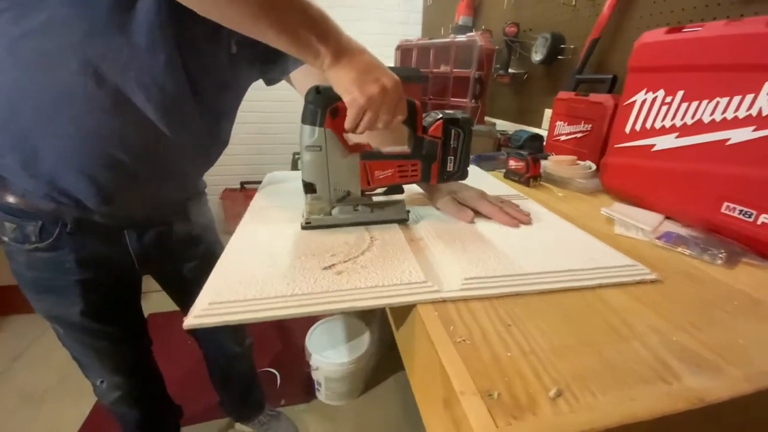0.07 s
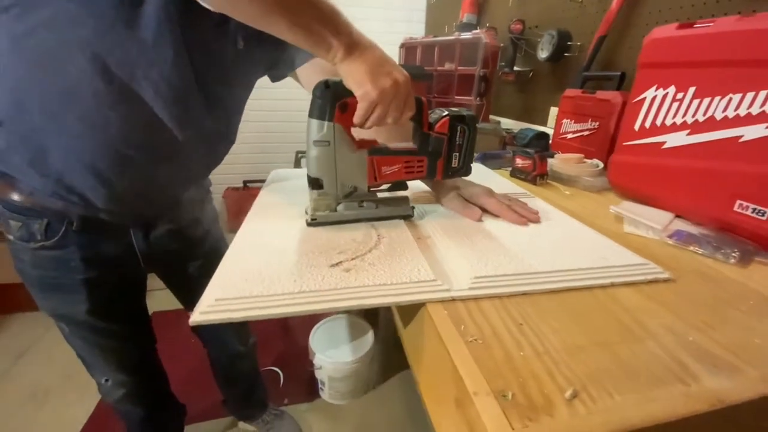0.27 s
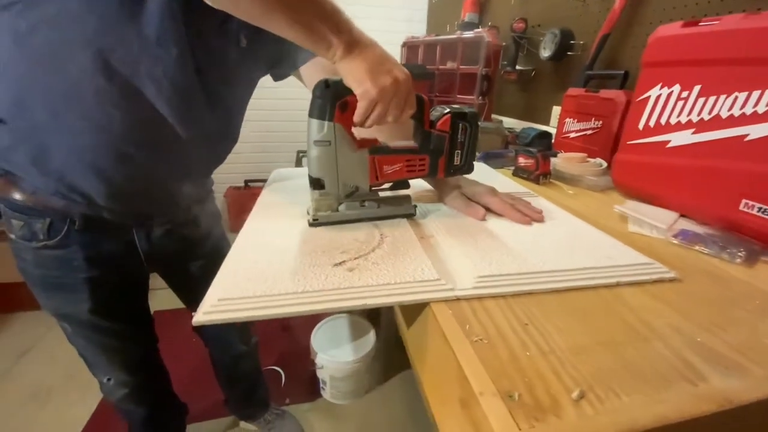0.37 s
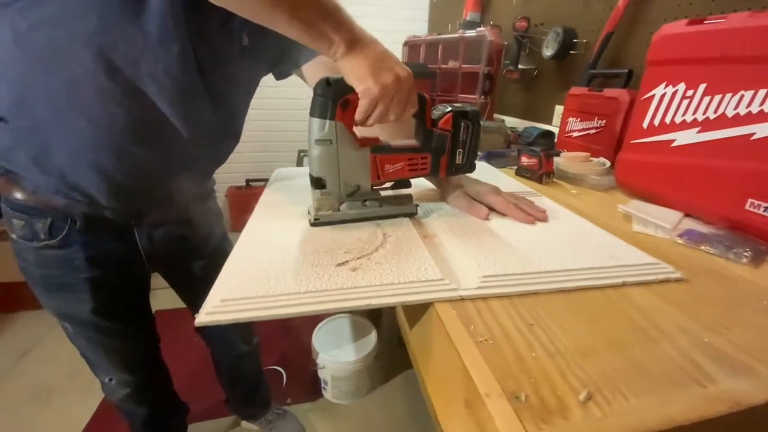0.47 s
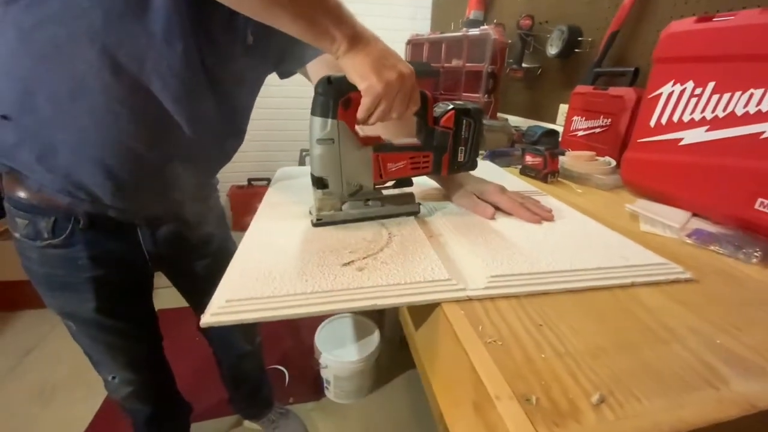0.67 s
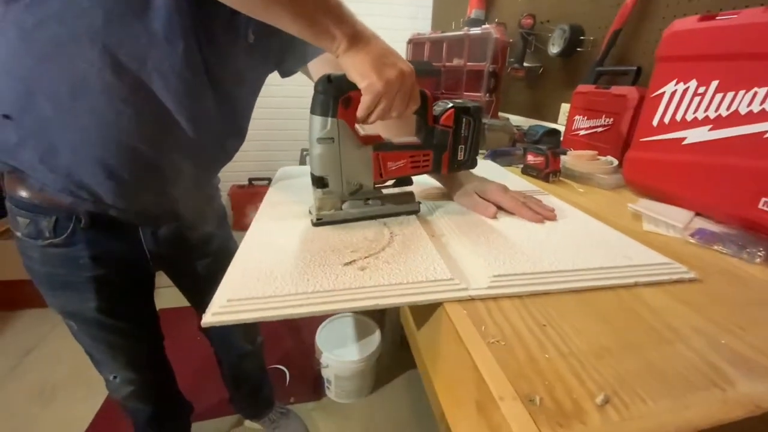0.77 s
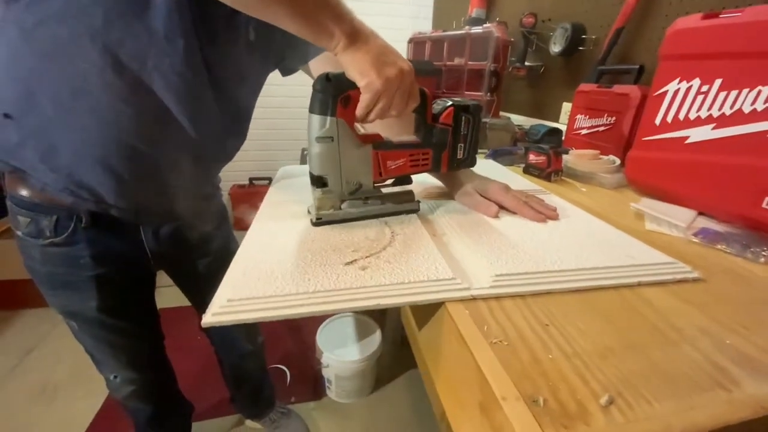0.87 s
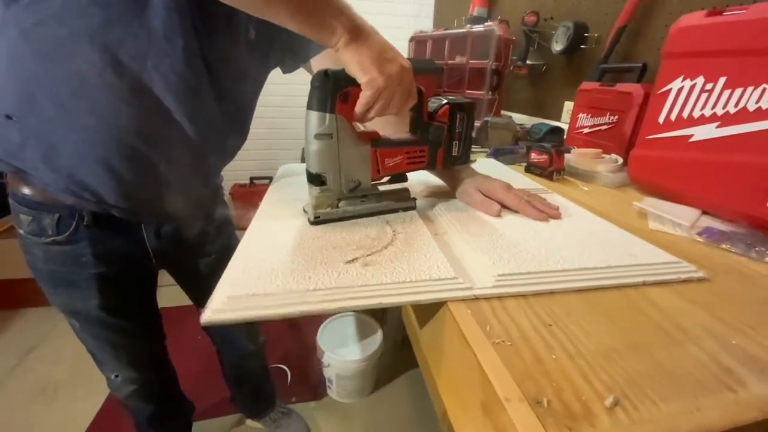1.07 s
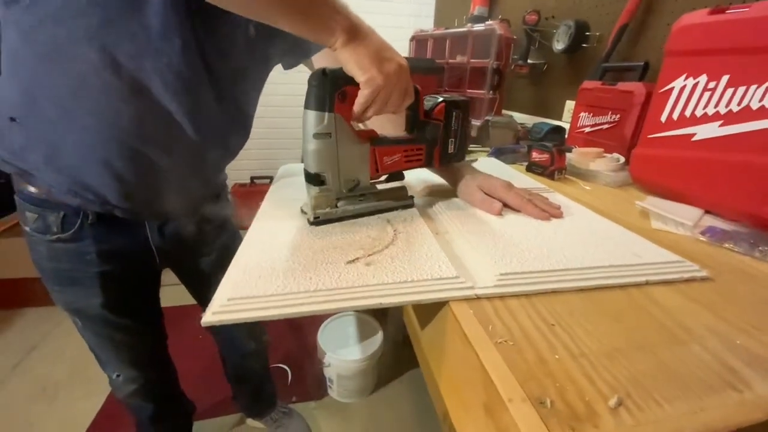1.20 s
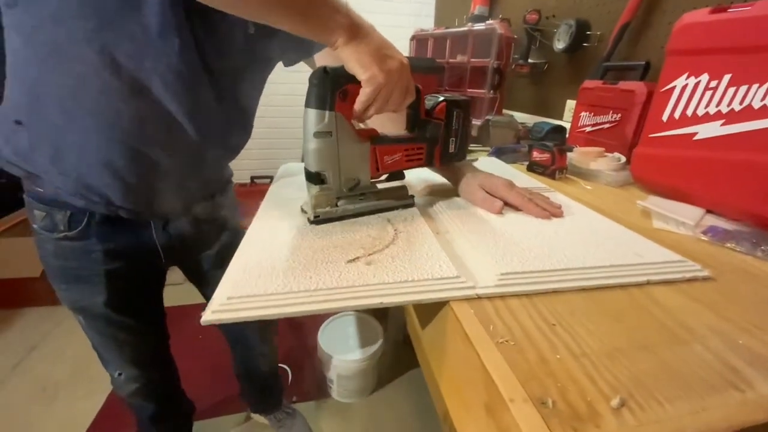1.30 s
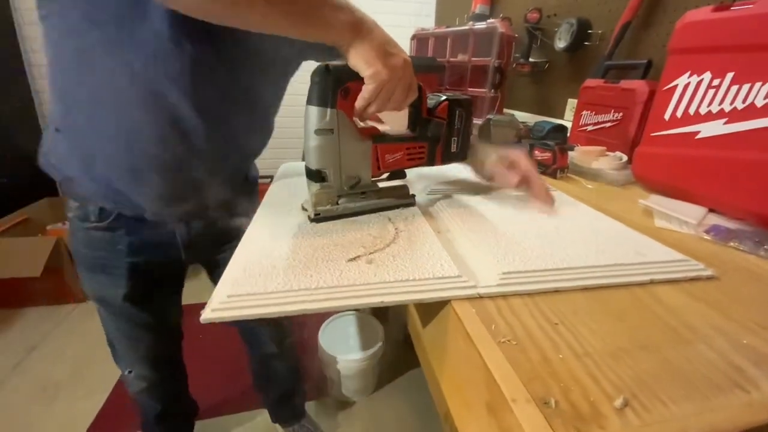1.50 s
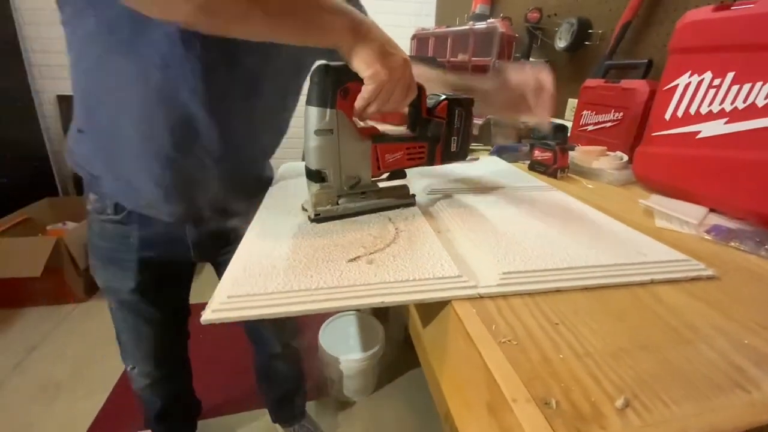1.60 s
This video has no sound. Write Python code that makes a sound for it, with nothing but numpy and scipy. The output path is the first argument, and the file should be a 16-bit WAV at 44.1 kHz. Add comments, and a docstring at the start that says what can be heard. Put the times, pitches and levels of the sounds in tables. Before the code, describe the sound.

A cordless jigsaw rasps and squeals through a panel, then slows and stops.

```python
"""A rattling, squealing rasp: a cordless jigsaw cuts a panel at 25 strokes a second, slows and stops.
The drive shakes the panel, which thumps and buzzes on the workbench. Loose parts rattle, the teeth
tear through the board, and the steel blade sticks and slips in the kerf, squealing on most strokes.
A few light knocks and a soft slide follow as the hands shift; a small workshop rings behind."""
import sys
import numpy as np
from scipy import signal
from scipy.fft import rfft, irfft, next_fast_len
from scipy.io import wavfile

SR = 44100
rng = np.random.default_rng(int(sys.argv[2]) if len(sys.argv) > 2 else 0)


def to_wav(s):
    """Save 16-bit WAV."""
    ch = np.atleast_2d(s).T  # columns
    pcm = np.round(np.clip(ch, -1, 1) * 32767)  # PCM
    wavfile.write(sys.argv[1], SR, pcm.astype(np.int16))


N = 72765
T = np.arange(N) / SR
FFT_SIZE = next_fast_len(2 * N)
BINS_HZ = np.maximum(np.arange(FFT_SIZE // 2 + 1) * SR / FFT_SIZE, 1)


def from_db(db):
    """Decibels to gain."""
    return 10 ** (np.asarray(db) / 20)


def rms_one(x):
    """Scale to rms 1."""
    return x / np.sqrt(np.mean(x ** 2) + 1e-20)


def curve(rows):
    """Join (t/s, value) rows by straight lines."""
    return np.interp(T, *np.transpose(rows))


def fader(rows):
    """Gain from (t/s, level/dB) rows, dying away at 180 dB a second after the last."""
    return from_db(curve(rows) - 180 * np.maximum(T - rows[-1][0], 0))


def swell(start, length):
    """Half a sine, rising from and falling to nothing."""
    return np.maximum(np.sin(np.pi * np.clip((T - start) / length, 0, 1)), 0)


def at_hz(rows, column=1):
    """One column of a spectrum table at every frequency."""
    rows = np.array(rows, float)
    return np.interp(np.log(BINS_HZ), np.log(rows[:, 0]), rows[:, column])


def through(x, response):
    """Filter by a frequency response."""
    return irfft(rfft(x, FFT_SIZE) * response, FFT_SIZE)[..., :N]


def colour(x, spectrum):
    """Equalise by (f/Hz, level/dB) rows; rms 1."""
    return rms_one(through(x, from_db(at_hz(spectrum))))


def edge(x, hz, kind, order=2):
    """High- or low-pass."""
    return signal.sosfilt(signal.butter(order, hz, kind, fs=SR, output="sos"), x)


def drift(hz):
    """Random wander below hz; rms 1."""
    return rms_one(edge(rng.standard_normal(2 * N), hz, "low")[N:])


def two_pole(x, hz, radius):
    """Band-pass that rings longer as its pole radius nears 1."""
    feedback = [1, -2 * radius * np.cos(2 * np.pi * hz / SR), radius ** 2]
    return signal.lfilter([1, 0, -1], feedback, x + 1e-18)


def resonate(x, hz, width_hz):
    """One resonance; rms 1."""
    return rms_one(two_pole(x, hz, np.exp(-np.pi * width_hz / SR)))


def body(x, modes):
    """Resonances in parallel, alternating in polarity; rms 1."""
    return rms_one(sum((-1) ** k * from_db(db) * resonate(x, hz, width)
                       for k, (hz, width, db) in enumerate(modes)))


def grains(per_s=11000, spread_db=2.5):
    """Fibres snap at random, a few much louder than the rest."""
    sizes = from_db(spread_db * np.minimum(rng.exponential(1, N), 4))
    return rms_one(sizes * rng.choice([-1, 1], N) * (rng.random(N) < per_s / SR))


def rattle(turns, count=52, jitter_s=.00006, spread_db=2):
    """Loose parts touch at the same crank angles on every stroke, never quite alike."""
    angles = (np.arange(count) + rng.random(count)) / count
    contact_turns = np.arange(-20, 20)[:, None] + angles
    times = np.interp(contact_turns, turns, T, left=-1, right=-1)
    times += jitter_s * rng.standard_normal(times.shape)
    force = rng.choice([-1, 1], count) * from_db(spread_db * rng.standard_normal(times.shape))
    inside = (times > 0) & (times < T[-1])
    return rms_one(np.bincount((times[inside] * SR).astype(int), force[inside], N))


def drive(turns, stroke_hz):
    """The reciprocating mass shakes the panel; at low speed the bench booms and shudders."""
    # tones of the drive: multiple of the stroke rate, level/dB
    orders = [(2, -26), (3, -17.5), (4, -8), (5, -1.5), (6, -5.5), (7, -1), (8, 5), (9, 2), (11, -13),
              (12, -11.5), (13, -1.5), (17, -5), (24, -10), (25, -6.5), (32, 1), (47, 2.5), (53, -2),
              (55, 2)]
    # booming modes of panel and bench: f/Hz, width/Hz, level/dB
    boom_modes = [(115, 51, -3.5), (206, 52, -3), (385, 320, -3)]
    # how hard the panel shakes: t/s, level/dB
    shake_level = [(0.0, -40), (0.04, -42.5), (0.078, -50), (0.146, -41.5), (0.175, -46), (0.196, -34),
                   (0.256, -34), (0.334, -40.5), (0.666, -33.5), (0.876, -44), (0.954, -33), (1.012, -33),
                   (1.05, -36), (1.08, -32.5), (1.186, -45), (1.264, -60), (1.28, -64)]
    peak_turn, scatter_cycles = .7, .54   # the tones roughly line up at this part of the turn
    tones = sum(from_db(db) * np.cos(2 * np.pi * (k * (turns - peak_turn) + scatter_cycles * rng.random()))
                for k, db in orders)
    slowdown_hz = np.clip(stroke_hz.max() - stroke_hz, 0, 6)
    hum = from_db(1.5 - 1.8 * slowdown_hz) * rms_one(tones)
    shaking = body(rattle(turns) + .5 * grains(), boom_modes)
    boom = from_db(-17 + 1.7 * slowdown_hz) * rms_one(edge(shaking, 79, "high", order=4))
    shudder = from_db(-9.5) * slowdown_hz / slowdown_hz.max() * resonate(grains(), hz=100, width_hz=62)
    return fader(shake_level) * (hum + boom + shudder)


def loose_panel(turns, waver_rad=.78, peak_turn=.75, rise_s=.0056):
    """The loose panel thumps on the bench and now and then buzzes, throbbing once a stroke."""
    # brief buzzes: t/s, length/s, level/dB, f/Hz
    buzzes = [(0.365, 0.096, -36.5, 599.5), (0.731, 0.18, -35, 615), (0.869, 0.15, -40.5, 590)]
    # thumps on the bench: t/s, level/dB, f/Hz, time to fall 20 dB/s
    thumps = [(0, -23, 172, 0.023), (.13, -40, 104, 0.039), (0.208, -34.5, 103, 0.056),
              (0.247, -29.5, 122, 0.074), (.256, -33, 185, .1), (.955, -35, 105.5, 0.12),
              (1.02, -32, 119, .09), (1.039, -25, 209, 0.04), (1.045, -27, 413, 0.029),
              (1.151, -37, 106, 0.084)]
    throb = 1 + np.cos(2 * np.pi * (turns - peak_turn))
    out = np.zeros(N)
    for start, length, db, hz in buzzes:
        tone = np.sin(2 * np.pi * hz * T + waver_rad * drift(hz=30))
        out += from_db(db) * swell(start, length) * throb * tone
    for start, db, hz, decay in thumps:
        age = np.maximum(T - start, 0)
        envelope = (1 - np.exp(-age / rise_s)) * from_db(db - 20 * age / decay)
        out += envelope * np.sin(2 * np.pi * hz * age)
    return out


def tooth_bite(turns, stroke_db=.5, return_db=1.05, chatter_db=1.6):
    """The teeth bite most at the top of the stroke, again on the return, and unevenly tooth to tooth."""
    angle = 2 * np.pi * turns
    return from_db(stroke_db * np.cos(angle) + return_db * np.cos(2 * angle) + chatter_db * drift(hz=170))


def cutting(turns, bite, crossover_hz=4170):
    """Rattle and tearing fibres sound through the body; the blade scrapes the kerf atop each stroke."""
    # tone of the tearing board: f/Hz, level/dB
    cut_spectrum = [(250, -3.5), (450, -8.5), (750, -5), (1100, -5.5), (1700, -2.5), (2300, 0.5),
                    (2900, -1), (3800, -7.5), (4800, -8.5), (5800, -4.5), (7000, -9.5), (8500, -13),
                    (11000, -12.5), (13000, -12), (15500, -21.5)]
    # modes of panel and saw body: f/Hz, width/Hz, level/dB
    body_modes = [(489, 25.7, -13), (618, 360, -11.5), (976, 91, -11), (1366, 170, 1.5), (2570, 40, -6.5),
                  (3150, 74, -10.5)]
    # bright modes of blade clamp and shoe: f/Hz, width/Hz, level/dB
    shoe_modes = [(6120, 1025, -1), (7400, 870, -4), (11150, 140, -6), (12650, 410, -13.5)]
    # fader for the rasp and the ringing body: t/s, level/dB
    rasp_level = [(0.0, -42.5), (0.024, -44.5), (0.074, -46), (0.11, -38), (0.178, -47), (0.196, -33.5),
                  (0.216, -39), (0.23, -31.5), (0.238, -32), (0.38, -29.5), (0.752, -31.5), (0.786, -29.5),
                  (1.114, -32), (1.126, -40.5), (1.136, -28.5), (1.172, -48), (1.254, -60.5), (1.28, -62)]
    # fader for chips, scrape and shoe: t/s, level/dB
    treble_level = [(0.0, -41), (0.078, -48), (0.116, -41.5), (0.174, -54), (0.188, -38), (0.212, -41.5),
                    (0.22, -35.5), (0.58, -32), (0.59, -36), (0.602, -33.5), (0.612, -34.5), (1.026, -34),
                    (1.058, -37.5), (1.066, -32.5), (1.126, -37.5), (1.14, -37.5), (1.226, -69),
                    (1.28, -82)]
    clatter = rattle(turns)
    teeth = bite * (from_db(-2) * grains() + from_db(-3.5) * clatter)
    tearing = colour(teeth, cut_spectrum)
    low_tearing = edge(tearing, crossover_hz, "low", order=4)
    rasp = from_db(-1.5) * rms_one(edge(low_tearing, 280, "high", order=3))
    ringing = from_db(-6) * body(clatter + .44 * grains(), body_modes)
    chips = rms_one(edge(tearing, crossover_hz, "high", order=4))
    top_of_stroke = np.exp(10.6 * (np.cos(2 * np.pi * turns) - 1))   # one narrow pulse a turn
    scrape = from_db(-1) * top_of_stroke * resonate(grains(), hz=4900, width_hz=900)
    shoe = from_db(-10.5) * body(teeth, shoe_modes)
    return fader(rasp_level) * (rasp + ringing) + fader(treble_level) * (chips + scrape + shoe)


def panel_sides(turns, bite):
    """The far parts of the panel add their own rattle and rasp, left and right."""
    # tone of the far parts: f/Hz, level/dB
    side_spectrum = [(100, -14), (250, -2), (480, 6), (680, 6), (900, 2), (1500, -1), (2100, -1), (2500, 1),
                     (3300, 0), (4300, -5), (6000, -4), (7000, 8), (7900, 5), (9200, 1), (10500, -8),
                     (16000, -11)]
    sides = np.array([cutting(turns, bite), cutting(turns, bite)])
    return through(sides, from_db(at_hz(side_spectrum) - 5))


def reflections(x, t60_s):
    """The workshop returns dense dying echoes, different at each ear."""
    # tone of the echoes: f/Hz, level/dB
    room_spectrum = [(100, -12.5), (1000, 4), (4200, -4.5), (6500, 3.5), (8600, 4.5), (11000, 2.5),
                     (16000, -20)]
    echoes = rng.standard_normal((2, N)) * from_db(-60 * T / t60_s) * (T > .0015)
    echoes /= np.sqrt(np.sum(echoes ** 2, axis=1, keepdims=True))
    return through(x, rfft(echoes, FFT_SIZE) * from_db(at_hz(room_spectrum)))


def room_tone():
    """A faint, dark hush, mostly common to both ears."""
    # tone of the quiet workshop: f/Hz, level/dB
    air_spectrum = [(30, -31.5), (60, -10), (125, 2.5), (250, -6), (500, -7.5), (1000, -13), (2000, -23),
                    (4000, -23.5), (8000, -25.5), (12000, -31.5), (15500, -58)]
    noise = rng.standard_normal(N) + .48 * rng.standard_normal((2, N))
    return from_db(-60) * colour(noise, air_spectrum)


def squeals():
    """The blade binds with a thin scrape, then sticks and slips: a wobbling tone, ragged when loud."""
    # each bind in the kerf: t/s, length/s, level/dB, f/Hz, roughness (0 is smooth)
    binds = [(0.096, 0.014, -26, 4466, 0.17), (0.113, 0.017, -30, 4485, 0.2),
             (0.275, 0.0071, -27, 5100, 1.1), (0.3198, 0.0037, -22.5, 5100, .9),
             (0.358, 0.0033, -28, 5060, 0.65), (0.44, 0.006, -25, 4950, .8), (0.479, 0.0032, -26, 4900, 1),
             (0.518, 0.0041, -19.5, 4830, 0.6), (0.556, 0.008, -9.5, 4434, 0.55),
             (.597, 0.0053, -5, 4270, 0.42), (0.64, 0.0045, -18, 4540, 0.7),
             (0.6765, 0.007, -13, 4326, 0.8), (.719, 0.0052, -18, 4680, 1.2),
             (0.84, 0.0021, -20.5, 4950, 1), (0.879, 0.0032, -17, 4560, 1),
             (0.9176, 0.0053, -12, 4460, 0.7), (0.9601, 0.012, -9.5, 4204, 0.8),
             (0.9705, 0.0025, -15.5, 4300, .6), (1.008, 0.019, -12, 4200, 0.84),
             (1.068, 0.018, -8.5, 4130, 0.52), (1.1352, 0.011, -6, 4254, 0.17),
             (1.142, 0.01, -9, 4020, 0.29), (1.152, 0.0051, -10.5, 4434, 0), (1.156, 0.024, -18, 4367, 0)]
    glide_depth, sag_depth, wobble_depth = .075, .04, .06   # fractions of the pitch
    wobble_hz, flutter_db, blur_rad = 276, 2.5, .4
    scrape_lead_s, scrape_lag_s, entry_lead_s, entry_s = .00071, .0041, .00473, .0061
    wobble, flutter, blur = drift(wobble_hz), drift(wobble_hz), drift(hz=900)
    wobble = rms_one(edge(wobble, wobble_hz / 2, "high"))
    scrape = from_db(-14) * edge(resonate(grains(), hz=5100, width_hz=1100), 5300, "low")
    entry = from_db(-16) * resonate(grains(), hz=5660, width_hz=400)
    out = np.zeros(N)
    for start, length, db, hz, rough in binds:
        grip = swell(start, length)
        glide = glide_depth * rough * (.5 - np.clip((T - start) / length, 0, 1))
        pitch_hz = hz * (1 + glide + sag_depth * (1 - grip) + wobble_depth * rough * wobble)
        phase = 2 * np.pi * np.cumsum(pitch_hz * (T >= start)) / SR
        swing = from_db(db + flutter_db * rough * flutter) * grip
        ragged = phase + blur_rad * rough * blur
        overtones = from_db(-14.5) * np.sin(2 * ragged) + from_db(-17) * np.sin(3 * ragged)
        rasp = scrape * swell(start - scrape_lead_s, scrape_lead_s + length + scrape_lag_s)
        rasp += entry * swell(start - entry_lead_s, entry_s)
        out += swing * (np.sin(phase) + swing * overtones) + from_db(db) * rough * rasp
    return out


def blade_ring(squeal):
    """Narrow modes of the steel blade ring on after each squeal."""
    # blade modes: f/Hz, t60/s, level/dB
    blade_modes = [(4160, 0.2, -14), (4150, 0.44, -17.5), (4450, .42, -19), (8230, .14, -12.5),
                   (8720, .14, -10)]
    out = np.zeros(N)
    for hz, t60, db in blade_modes:
        radius = from_db(-60 / (t60 * SR))
        out += from_db(db) * (1 - radius ** 2) / 2 * two_pole(squeal, hz, radius)
    return out


def knocks(rows, crack_db, rise_s):
    """Short gritty contacts, each with a broad crack and one resonance."""
    out = np.zeros(N)
    for start, db, hz, decay in rows:
        age = np.maximum(T - start, 0)
        envelope = (1 - np.exp(-age / rise_s)) * from_db(db - 20 * age / decay)
        grit = rng.standard_normal(N)
        crack = from_db(crack_db) * rms_one(edge(grit, 5300, "low", order=1))
        out += envelope * (resonate(grit, hz, width_hz=140) + crack)
    return out


def tooth_catches():
    """The teeth catch early in the cut with sharp, pitched ticks."""
    # catches: t/s, level/dB, f/Hz, time to fall 20 dB/s
    catches = [(.1, -35, 3260, 0.038), (.11, -35.5, 1263, 0.02), (.112, -29, 4810, 0.019),
               (.186, -44, 5640, 0.008), (.192, -35, 1580, 0.003), (.2205, -22, 5830, .006),
               (.227, -17, 2710, 0.016), (.272, -22, 5910, 0.0058), (.311, -18.5, 5930, .005),
               (.317, -22, 3040, 0.012), (.3595, -16.5, 2730, 0.018), (.394, -21.5, 6000, 0.0037)]
    return knocks(catches, crack_db=-27, rise_s=.0006)


def hands():
    """Hands land softly on saw and panel, and one slides off the panel."""
    # light knocks: t/s, level/dB, f/Hz, time to fall 20 dB/s
    touches = [(1.279, -56, 1581, 0.023), (1.365, -48.5, 1880, 0.04), (1.377, -54.5, 1720, .035),
               (1.397, -46, 2350, .013), (1.402, -51, 900, 0.014), (1.4025, -54.5, 537, .022),
               (1.447, -53, 1510, 0.02), (1.514, -55, 5050, 0.0092), (1.576, -56.5, 6450, 0.0066),
               (1.587, -51, 7500, .008), (1.609, -51.5, 3990, 0.0064)]
    # fader for the sliding hand: t/s, level/dB
    slide_level = [(1.3, -76.5), (1.38, -75), (1.435, -63), (1.453, -56.5), (1.47, -68), (1.5, -80),
                   (1.55, -62.5), (1.65, -66.5)]
    # tone of the sliding hand: f/Hz, level/dB
    slide_spectrum = [(400, -8.5), (1200, -1), (3000, 10), (6000, -4.5), (9000, -3.5), (12000, -12),
                      (16000, -23)]
    taps = knocks(touches, crack_db=-3, rise_s=.0046)
    return taps + from_db(curve(slide_level)) * colour(grains(), slide_spectrum)


def scene():
    """Saw, hands and room tone in the workshop, in stereo."""
    # strokes a second: t/s, f/Hz
    stroke_rate = [(0, 19.8), (.2, 21.15), (.296, 24.8), (.316, 24.7), (.866, 25.2), (.884, 26.6),
                   (.964, 21.8), (1.056, 17.4), (1.144, 14.7)]
    stroke_hz = curve(stroke_rate)
    turns = np.cumsum(stroke_hz) / SR   # one crank turn a stroke; whole numbers are the top
    turns -= np.interp(.6, T, turns)   # a stroke tops out at 0.6 s
    handling = hands()
    bite = tooth_bite(turns)
    bench = drive(turns, stroke_hz) + loose_panel(turns) + cutting(turns, bite)
    bench += tooth_catches() + handling
    squeal = squeals()
    blade = squeal + blade_ring(squeal)
    sides = panel_sides(turns, bite)
    early = from_db(-5) * reflections(blade, t60_s=.14)
    tail = from_db(-14) * reflections(bench + blade, t60_s=.43)
    return bench + blade + sides + early + tail + room_tone()


def record(dry, stopband_hz=16800):
    """Two microphone ports hear the scene with differing phase and level; the top is cut steeply."""
    # the ports: f/Hz, left lead over right/rad, left minus right level/dB
    ports = [(150, 0, .7), (400, -.1, 2.8), (600, .9, 4.3), (820, 1.8, 1.8), (1080, 1.0, 5.6),
             (1400, .1, 4), (1750, -.5, -.5), (2200, -1.5, 3.5), (2550, -3.2, 6.5), (3200, -5, 2),
             (4100, -6.2, .6), (6000, -6.7, -2), (7300, -4.6, 3.5), (9000, -6.7, 2), (11000, -6.3, 0)]
    left = np.exp(1j * at_hz(ports, column=1)) * from_db(at_hz(ports, column=2) / 2)
    right = 1 / np.abs(left)
    heard = through(dry, np.array([left, right]))
    return signal.sosfilt(signal.cheby2(16, 70, stopband_hz, fs=SR, output="sos"), heard)


dry = scene()
out = record(dry)
to_wav(out)
```